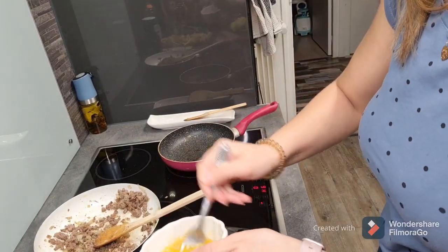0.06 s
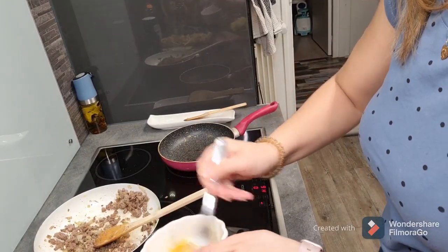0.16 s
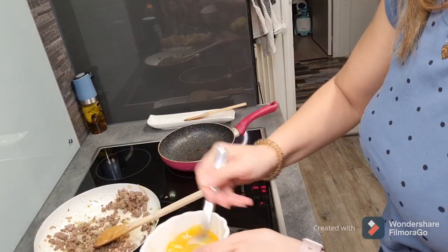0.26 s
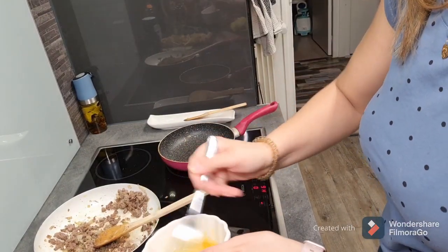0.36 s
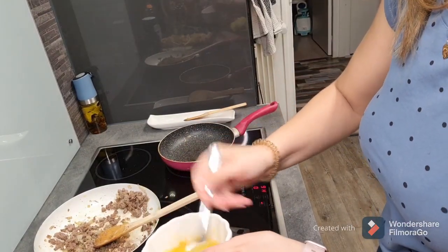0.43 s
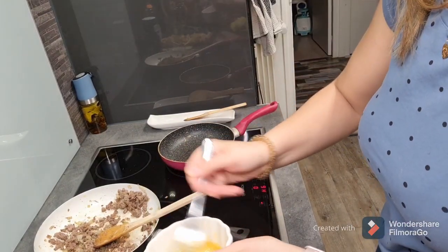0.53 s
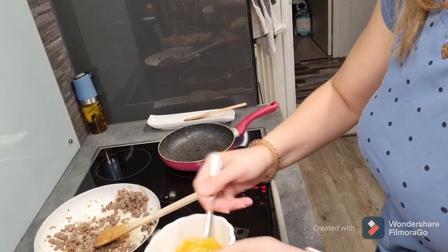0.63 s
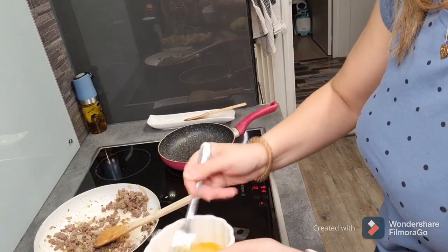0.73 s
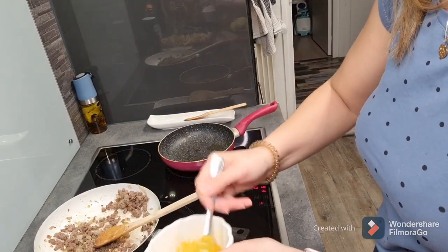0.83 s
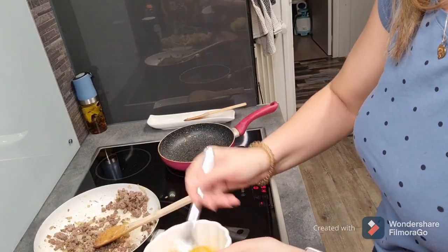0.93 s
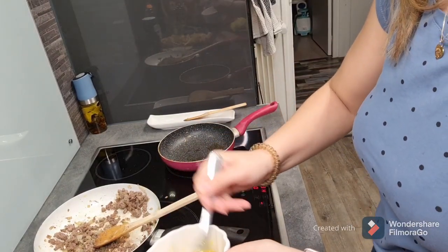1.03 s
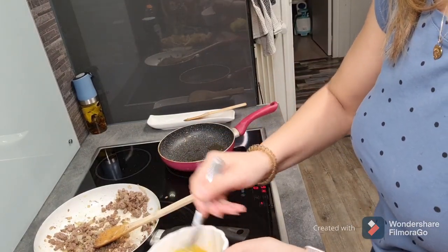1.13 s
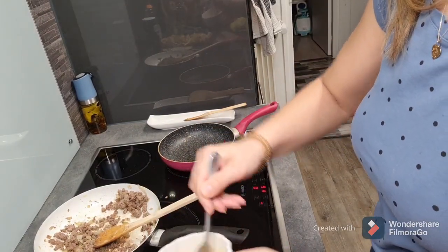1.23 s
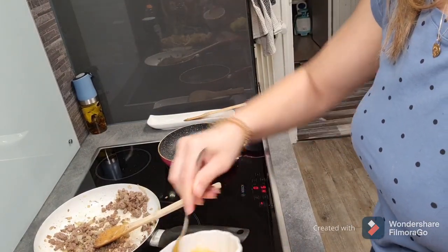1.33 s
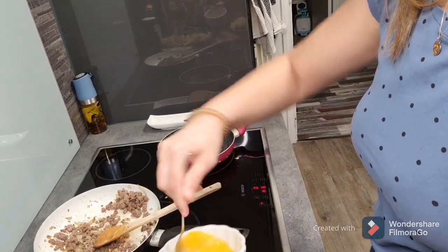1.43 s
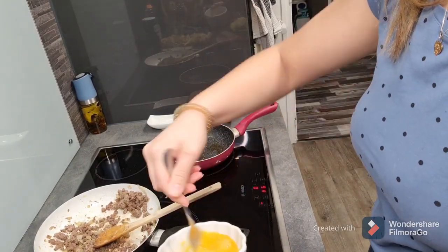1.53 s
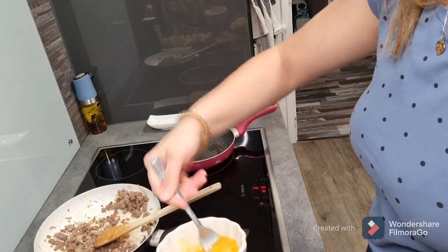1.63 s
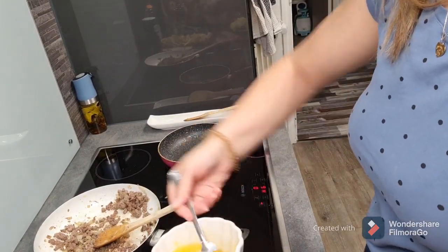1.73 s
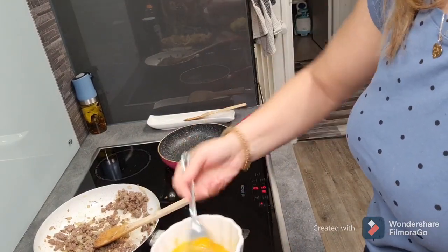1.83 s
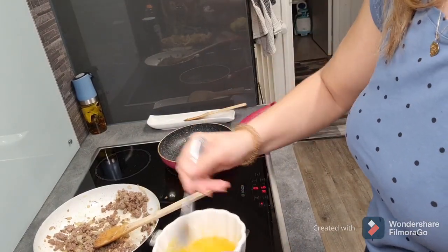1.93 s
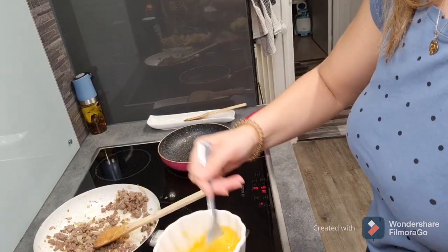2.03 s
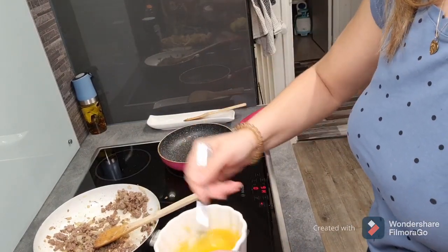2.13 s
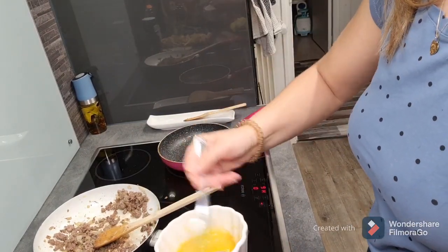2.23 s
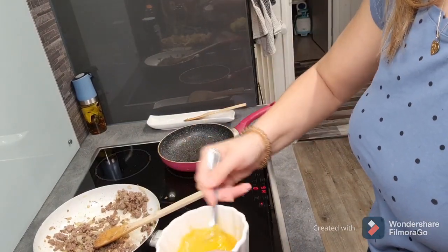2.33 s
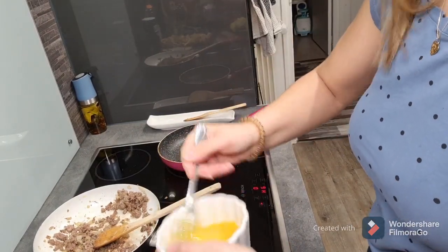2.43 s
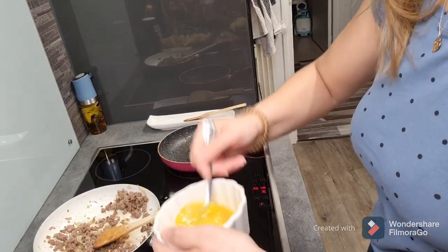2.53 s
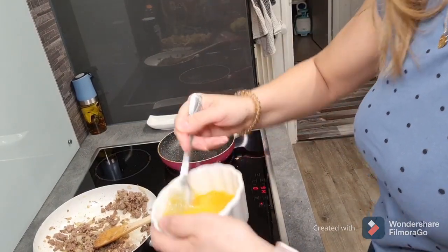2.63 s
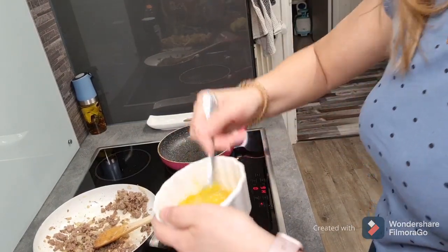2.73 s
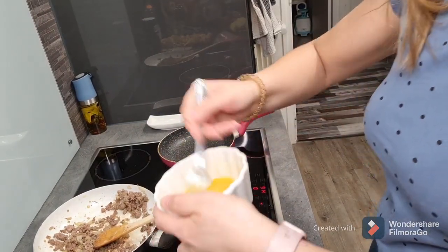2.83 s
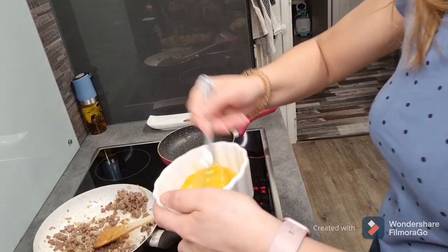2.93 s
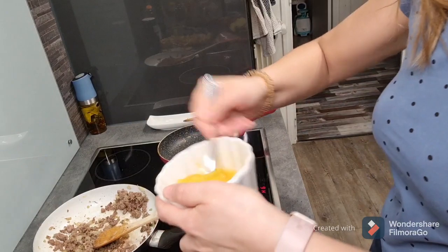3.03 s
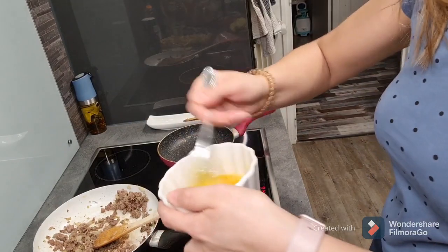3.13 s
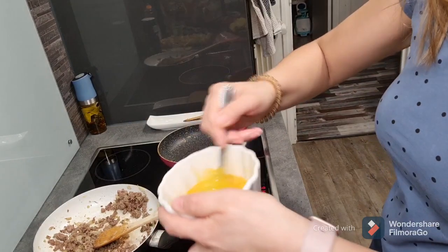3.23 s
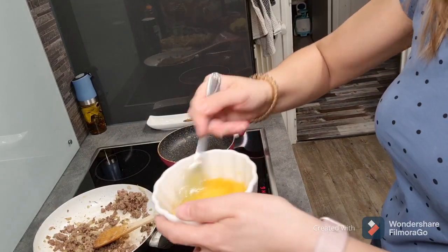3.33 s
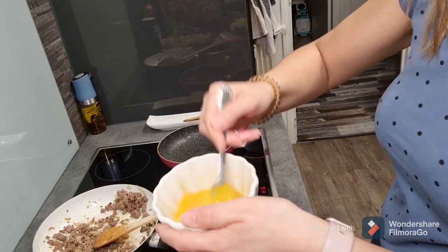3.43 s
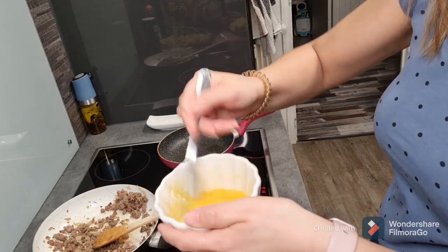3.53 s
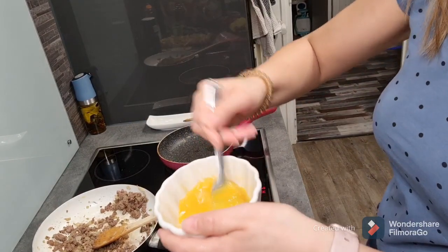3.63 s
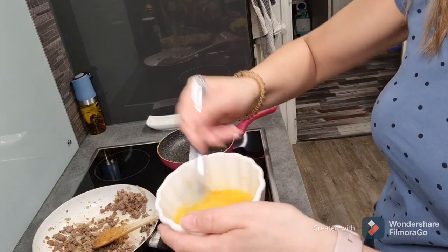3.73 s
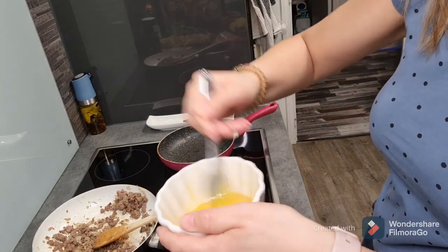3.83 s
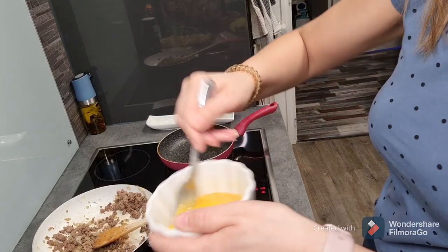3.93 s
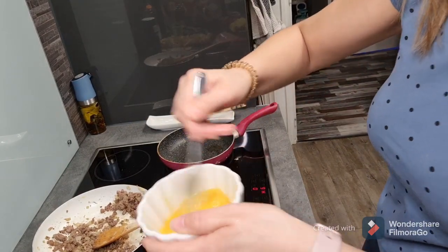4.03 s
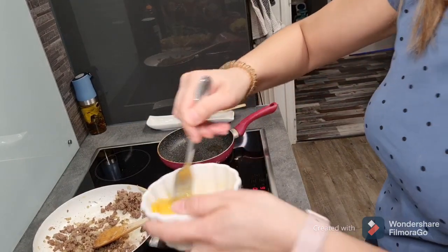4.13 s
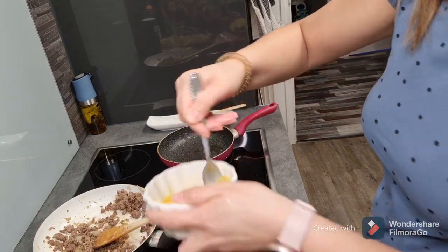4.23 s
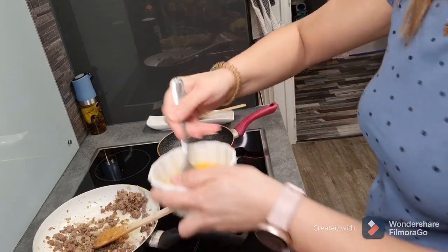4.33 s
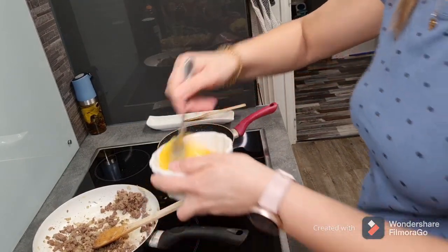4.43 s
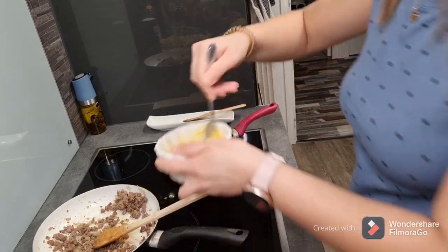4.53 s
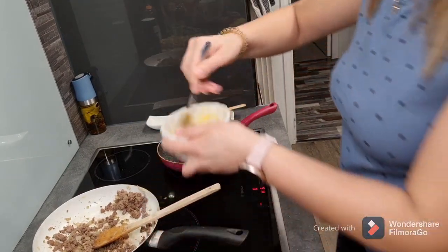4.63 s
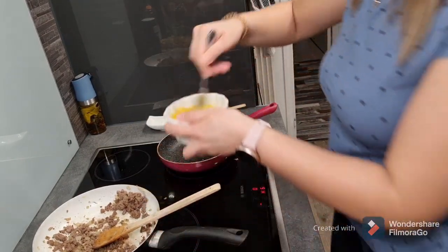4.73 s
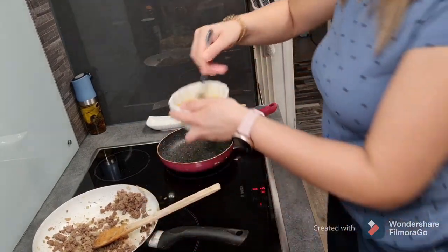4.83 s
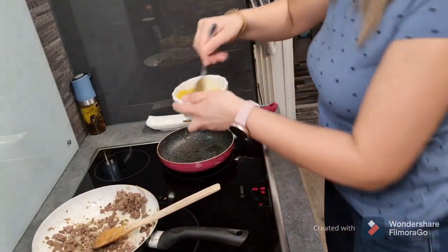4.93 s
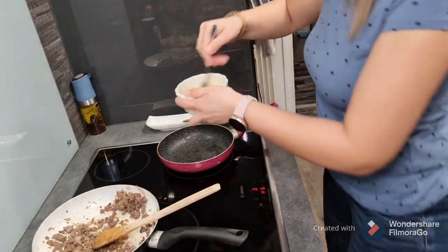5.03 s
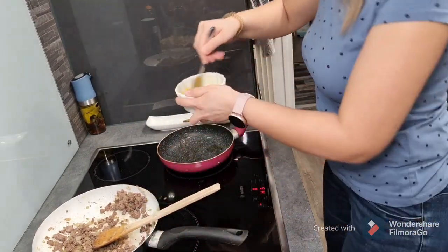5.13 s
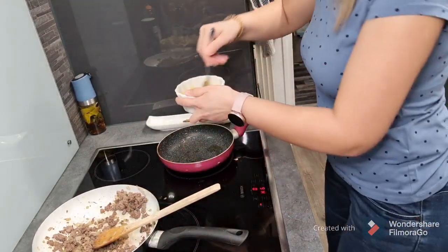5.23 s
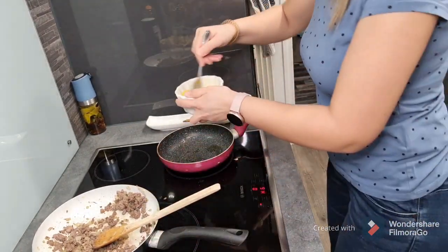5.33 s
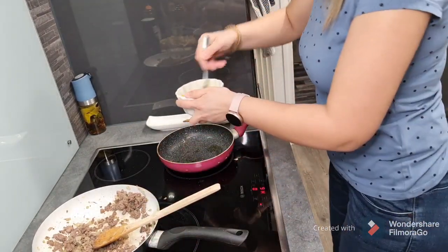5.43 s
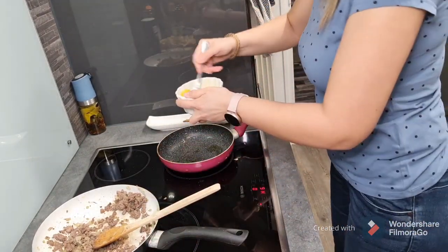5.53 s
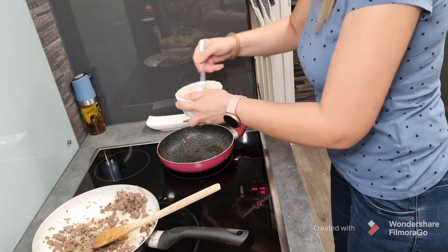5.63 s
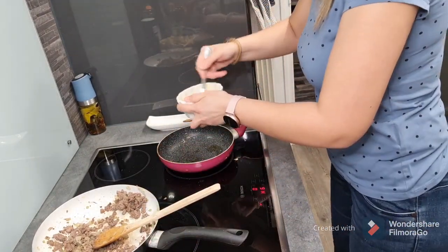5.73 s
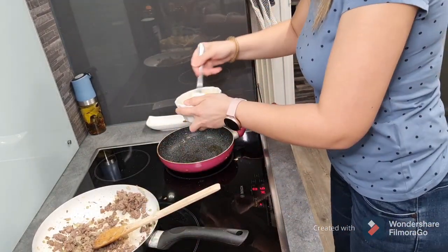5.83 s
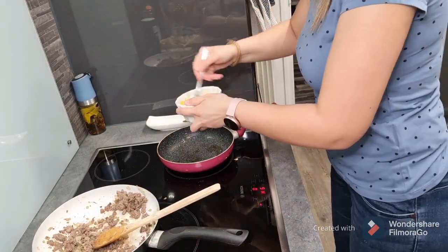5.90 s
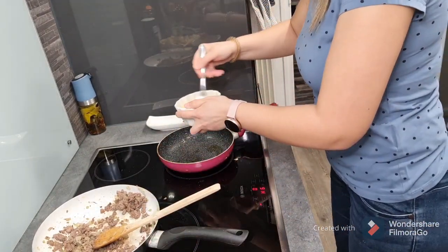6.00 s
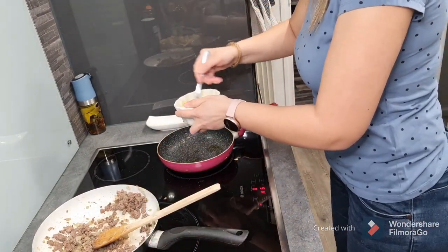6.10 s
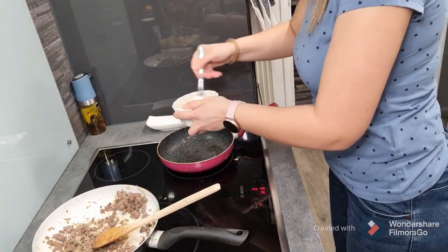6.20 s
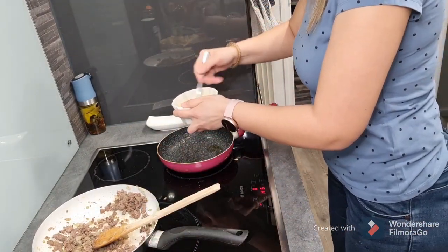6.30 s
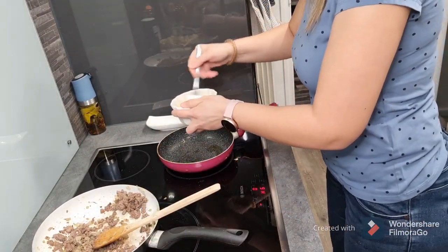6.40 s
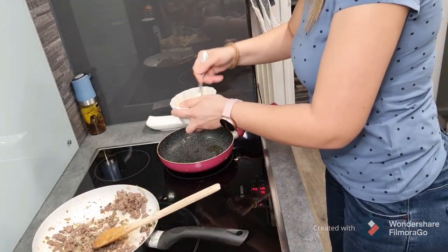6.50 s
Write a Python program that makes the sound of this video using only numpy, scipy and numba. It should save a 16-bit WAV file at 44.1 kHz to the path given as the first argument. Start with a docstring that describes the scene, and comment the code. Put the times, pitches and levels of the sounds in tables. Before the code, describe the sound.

A fork briskly beats eggs in a ceramic bowl, clinking and swishing wetly, then moves away into softer scraping over a low kitchen hum.

```python
"""A steel fork beats eggs in a hand-held ceramic bowl, between five and six strokes a second, in a small kitchen.
Each stroke ticks and clonks as decaying modes of bowl, tines and fork, and swishes through the egg as
friction noise in gliding resonances; trapped air adds short low gulps and bubbles of rising pitch.
After four seconds the bowl is carried further off: its echo swells, then sinks, and a soft, sizzling
scrape of stirring joins. Steady appliance hum and a low room rumble lie behind it throughout."""
import sys
import numpy as np
from scipy import signal
from scipy.fft import rfft, irfft
from scipy.io import wavfile
from numba import njit

SR = 44100
rng = np.random.default_rng(int(sys.argv[2]) if len(sys.argv) > 2 else 0)


def file_out(sig):
    """Save sig as 16-bit WAV at sys.argv[1]."""
    # one column per channel
    cols = np.atleast_2d(sig).T
    # limit, then scale
    lim = np.clip(cols, -1, 1)
    pcm = np.round(lim * 32767).astype(np.int16)
    wavfile.write(sys.argv[1], SR, pcm)


N = 289296
TIME = np.arange(N) / SR
HIT = TIME[:SR // 6]  # time within one strike, s

# fork meets bowl, relative levels:
# (time [s], bowl knock [dB], tine tick [dB], clonk level [dB], clonk pitch [Hz], clonk t60 [s])
FORK_STRIKES = [(0.0298, -23.5, -37.5, -36, 1770, 0.035), (0.2056, -22.5, -40, -24.5, 1747, 0.039),
                (0.2677, -35, -43.5, -39, 1600, 0.045), (0.389, -25.5, -39.5, -37, 1870, 0.033),
                (0.4231, -26, -50, -15.5, 1795, 0.039), (0.5784, -28, -35.5, -16.5, 1910, 0.013),
                (0.596, -28, -59, -29, 1900, 0.0085), (0.731, -41, -61, -39.5, 1720, 0.075),
                (0.75, -29, -39.5, -18.5, 1860, 0.0084), (0.764, -23, -37, -27, 1710, 0.1),
                (0.9087, -22, -37.5, -20, 1470, 0.035), (0.9458, -25, -44, -16, 1730, 0.024),
                (1.083, -20.5, -43, -27, 1470, 0.019), (1.093, -23, -41, -25, 1780, 0.047),
                (1.1366, -36, -50, -9.5, 1880, 0.013), (1.1866, -37, -63, -30.5, 1730, 0.027),
                (1.2521, -25.5, -64, -35, 1540, 0.027), (1.2625, -46, -40.5, -31.5, 3580, .037),
                (1.3416, -28, -46.5, -43, 1320, 0.054), (1.3721, -24, -43.5, -38, 1520, 0.033),
                (1.679, -24.5, -57, -36.5, 1810, 0.028), (1.847, -20, -42, -25, 1560, 0.013),
                (1.8785, -24, -45.5, -26, 1590, 0.013), (2.071, -32, -43.5, -32.5, 3510, 0.022),
                (2.098, -28.5, -35.5, -34, 1670, .024), (2.271, -26.5, -40, -27.5, 1710, .028),
                (2.4458, -18.5, -37, -39.5, 1306, 0.084), (2.482, -37, -58, -28, 1660, 0.027),
                (2.6025, -36, -50, -42.5, 1450, 0.034), (2.6337, -30, -39, -30, 1665, 0.034),
                (2.6507, -42, -62, -26.5, 1435, 0.083), (2.786, -56, -62, -18, 1320, 0.017),
                (2.792, -21, -44, -14.5, 1440, 0.035), (2.8093, -26, -36.5, -63, 1900, .02),
                (2.9927, -35, -39, -18.5, 2035, .016), (3.1422, -34, -54, -27.5, 1230, 0.021),
                (3.1574, -4.5, -29, -34, 2480, 0.068), (3.163, -14, -60, -32, 1890, 0.1),
                (3.331, -15, -41, -20.5, 1410, 0.0093), (3.3378, -23, -32, -11, 2540, 0.0091),
                (3.384, -35, -79, -30.5, 1310, 0.039), (3.506, -14, -38.5, -9.5, 1980, .011),
                (3.5172, -42, -37.5, -33, 1510, 0.022), (3.7092, -29, -31, -25, 2160, 0.016),
                (3.7206, -18.5, -52, -27, 1250, 0.062), (3.7494, -39, -66, -28, 1450, 0.049),
                (3.8705, -14.5, -64, -1.5, 2100, 0.0084), (3.8822, -18, -33.5, -25, 1440, 0.022),
                (4.0541, -15, -31.5, -20.5, 1455, 0.071), (4.0853, -44, -53, -29.5, 1450, 0.082),
                (4.2044, -6.5, -26.5, -12.5, 1925, 0.025), (4.2443, -22.5, -41, -28.5, 1690, .02),
                (4.359, -27, -48, -32, 3290, 0.02), (4.4479, -15, -36, -22.5, 2140, 0.026),
                (4.5918, -21.5, -43.5, -22, 1740, 0.024), (4.644, -16, -45, -24, 1890, 0.021),
                (4.792, -29.5, -44, -28.5, 1565, .021), (4.7945, -43, -59, -32.5, 3280, 0.023),
                (4.904, -34, -58, -30, 2800, 0.022), (4.908, -44, -62, -30.5, 3480, 0.013),
                (4.9769, -26, -47, -60, 1700, 0.025), (5.183, -29, -45.5, -43, 1374, 0.078),
                (5.622, -33, -43.5, -36, 1420, 0.036), (5.827, -30, -42, -39, 1300, 0.05),
                (5.8602, -30, -45, -34, 1300, .06), (5.975, -24.5, -41.5, -30, 1434, 0.082),
                (5.998, -36, -50, -35, 1500, 0.03), (6.4322, -39, -50, -28.5, 1420, 0.028)]
# fork dragged through the egg, relative levels: (time of the middle [s], level [dB], length [s], scrape pitch [Hz])
EGG_PASSES = [(0.073, -40.5, 0.084, 1476), (0.241, -39.5, 0.063, 1700), (0.425, -30.5, 0.046, 1900),
              (0.594, -25.5, 0.031, 1780), (0.771, -28.5, 0.026, 1720), (0.944, -31, 0.056, 1840),
              (1.124, -33, 0.054, 1840), (1.293, -34.5, 0.071, 1720), (1.668, -47.5, 0.13, 2240),
              (1.868, -41, 0.043, 1560), (2.121, -47, 0.079, 1760), (2.296, -34.5, 0.056, 1760),
              (2.466, -39.5, 0.075, 1480), (2.651, -30, 0.036, 1510), (2.803, -24, 0.029, 1450),
              (3.002, -37, 0.026, 1820), (3.17, -33.5, 0.042, 1750), (3.351, -28, 0.033, 1330),
              (3.531, -33, 0.054, 1780), (3.722, -28, 0.04, 1500), (3.884, -21.5, 0.027, 1448),
              (4.09, -33, 0.06, 1470), (4.219, -29, 0.037, 1760), (4.326, -41.5, 0.024, 1550),
              (4.449, -30, 0.015, 1480), (4.65, -36.5, 0.046, 1960), (4.795, -51, 0.01, 1480),
              (4.87, -50, 0.052, 1460), (4.986, -42.5, 0.037, 1700), (5.188, -38, 0.024, 1555),
              (5.321, -40, 0.019, 1370), (5.413, -41, 0.02, 1760), (5.695, -39.5, 0.035, 1640),
              (5.877, -38.5, 0.048, 1480), (5.989, -26, 0.029, 1350), (6.056, -42.5, 0.062, 1840),
              (6.257, -40.5, 0.053, 1420), (6.364, -47, 0.01, 1350), (6.442, -38, 0.041, 1620)]
# the tines stay on the ceramic once the egg is stirred: (time [s], friction level [dB])
STIR_FRICTION = [(0, -91), (3.9, -95), (4.3, -51), (4.75, -64.5), (5.35, -53.5), (5.65, -57.5),
                 (6.1, -55.5), (6.56, -51.5)]
# modes of the bowl, damped by the hand and the egg: (frequency [Hz], level [dB], t60 [s])
BOWL_MODES = [(1930, -1, .08), (2470, -3, .06), (2720, -3, .06), (3100, -5, .06), (3500, -3, .06),
              (3760, -1, .07), (3970, 0, .06), (4280, -3, .06), (4565, -3, .06), (4770, -4, .06),
              (4960, -4, .06), (5220, -5, .06), (5960, -8, .06)]
# where the bowl is held: (time [s], left minus right [dB])
BOWL_PLACE = [(0, 1.5), (1.8, 3), (2.8, 3), (3.2, 3), (3.7, 2.5), (4.2, 4), (4.6, -0.5), (6.56, 2)]


def fork(knock_db=9.0, tick_db=23.5):
    """Every contact sounds both the bowl and the tines, and a neighbouring tine lands a moment later."""
    # colour of the contact on the ceramic: (frequency [Hz], level [dB])
    ceramic_colour = [(150, -25.5), (450, -41.5), (800, -24), (1500, -5), (2600, 3.5), (4000, -4),
                      (5300, -2.5), (6500, -11.5), (10000, -22.5), (16000, -33)]
    # colour of the contact on the steel: (frequency [Hz], level [dB])
    steel_colour = [(3000, -29), (7000, -8), (8300, 4), (9300, 5.5), (10500, -3), (12500, -6.5),
                    (16000, -3.5)]
    # modes of the steel tines: (frequency [Hz], level [dB], t60 [s])
    tine_modes = [(8540, -16.5, 0.047), (8950, 4, 0.031), (8730, 11.5, 0.024), (8900, -21, 0.035)]
    shortest_s, longest_s, bounce_db = 0.002, 0.0076, -10.5  # delay and level of the second tine
    tine_pan_db = 0.5
    out = np.zeros((2, N))
    for (s, bowl_db, steel_db, *_), late in zip(FORK_STRIKES, rng.random(len(FORK_STRIKES))):
        pan_db = np.interp(s, *np.transpose(BOWL_PLACE))
        bounce_s = shortest_s + late * (longest_s - shortest_s)
        for delay, db in ((0, 0), (bounce_s, bounce_db)):
            bowl = strike(ceramic_colour, BOWL_MODES, chatter_db=-11, ring_db=-12, width=0.76)
            steel = strike(steel_colour, tine_modes, chatter_db=-17, ring_db=-7.5, width=0.76)
            add(out, s + delay, undb(bowl_db + knock_db + db) * bowl, pan_db)
            add(out, s + delay, undb(steel_db + tick_db + db) * steel, pan_db + tine_pan_db)
    return out


def strike(spectrum, modes, chatter_db, ring_db, width):
    """A sharp crack and a brief chatter of the contact, coloured by the spot that is hit, over decaying modes."""
    crack = np.exp(-HIT / 0.00038)
    chatter = undb(chatter_db) * np.exp(-HIT / 0.0062) + undb(-21.0) * np.exp(-HIT / 0.0063)
    envelope = crack + chatter
    spot = np.array(spectrum) + [0, 2.2] * rng.standard_normal((len(spectrum), 1))  # scatters the levels only
    contacts = [unit(colour(envelope * noise, spot)) for noise in rng.standard_normal((2, len(HIT)))]
    hz, db, t60 = np.transpose(modes)[:, :, None]
    detune = 0.015 * rng.standard_normal((len(modes), 1))
    spot_db = 3 * rng.standard_normal((len(modes), 1))
    ring = undb(db + spot_db - 60 * HIT / t60) * np.sin(2 * np.pi * hz * (1 + detune) * HIT)
    return unit(stereo(*contacts, width) + undb(ring_db) * unit(ring.sum(0)))


def clonks(slide=0.015):
    """The fork's bending modes, knocked into motion against the bowl; the pitch depends on where it lands."""
    # bending modes: (multiple of the clonk pitch [ratio], level [dB], share of the clonk's t60 [ratio])
    bending_modes = [(1.001, 1.5, 0.9), (1.411, -12, 0.69)]
    clonk_pan_db, pan_scatter_db = -1, -2
    out = np.zeros((2, N))
    scatter = rng.standard_normal((len(FORK_STRIKES), 2))
    for (s, _, _, db, hz, t60), (bend, side) in zip(FORK_STRIKES, scatter):
        pan_db = np.interp(s, *np.transpose(BOWL_PLACE)) + clonk_pan_db + pan_scatter_db * side
        for ratio, mode_db, share in bending_modes:
            note = ping(hz * ratio, t60 * share, glide=slide * bend)
            add(out, s, undb(db + mode_db) * note, pan_db)
    return out


def ping(hz, t60, glide, onset_s=0.00087):
    """One resonance rings for a few cycles, damped by the thick egg, while its pitch may slide."""
    t = TIME[:int(t60 * SR) + 2]
    envelope = (1 - np.exp(-t / onset_s)) * undb(-60 * t / t60)
    return envelope * np.sin(2 * np.pi * hz * t * (1 + glide * t / t60))


def swishes(swish_db=-5.5, stir_spray_db=-6, q=19.0, upper_db=-3, broad_db=-2, width=0.85, wet_hz=2040):
    """The tines scrape through the egg: friction rings the fork's gliding resonances and throws a fine wet spray."""
    # spray of a pass: (time [s], level before the length correction [dB])
    spray_level = [(0, -54), (2.3, -54.5), (3.9, -69.5), (4.7, -56), (5.2, -54.5), (6.56, -45.5)]
    # colour of steel rubbing on wet ceramic: (frequency [Hz], level [dB])
    rub_colour = [(500, -6), (1000, -14.5), (1400, 6.5), (2000, 0.5), (2900, 2.5), (3600, -18.5),
                  (5500, -19), (8000, -30), (16000, -42)]
    # colour of the egg spray: (frequency [Hz], level [dB])
    spray_colour = [(1500, -12), (3500, -4), (5500, 3), (7200, -1.5), (9000, 0.5), (10500, -0.5),
                    (16000, -4)]
    spray_db_per_octave = 0.5  # a pass twice as long throws this much more spray
    stir_swell_db = -1.5  # the rubbing dips at each pass and swells between passes
    upper_centre_hz = 2735  # second resonance of the sliding fork
    glide, glide_scatter = 0.083, 0.036  # both resonances rise through each pass and sink on the way back
    wet_glide, wet_scatter = 0.11, 0.15  # the egg's resonances rise as it drains from the tines
    muffle = 0.35  # a harder pass goes deeper: dB lost in the upper resonances per dB above the average pass

    s, db, length, hz = np.transpose(EGG_PASSES)
    spray_db = np.interp(s, *np.transpose(spray_level)) + spray_db_per_octave * np.log2(length / length.mean())
    turn = 2 * np.pi * np.interp(TIME, s, np.arange(len(s)))  # one turn of the wrist from pass to pass
    stir = undb(curve(STIR_FRICTION) + stir_swell_db * np.cos(turn))
    rub = np.sqrt(stir ** 2 + passes(db + swish_db))
    splash = np.sqrt((stir * undb(stir_spray_db)) ** 2 + passes(spray_db))

    lower_hz, upper_hz = (centre * np.exp(glide * np.sin(turn) + glide_scatter * wander(rate_hz=12))
                          for centre in (np.interp(TIME, s, hz), upper_centre_hz))
    # egg clinging to the tines adds two restless resonances
    low_wet_hz, high_wet_hz = (wet_hz * ratio * np.exp(wet_glide * np.sin(turn) + wet_scatter * wander(rate_hz=22))
                               for ratio in (0.9, 1.25))
    deep_db = muffle * np.interp(TIME, s, np.maximum(db - db.mean(), 0))
    voices = [(lower_hz, 0), (upper_hz, upper_db - deep_db),
              (low_wet_hz, broad_db), (high_wet_hz, broad_db - deep_db)]
    # the tines grip and let go, so each resonance comes in bursts of its own
    grips = [undb(7 * np.tanh(wander(rate_hz=70))) for _ in voices]

    parts = []
    for _ in range(2):
        slips = colour(friction(grain_db=3.5), rub_colour)
        body = sum(undb(gain_db) * steady(resonance(slips * grip, track, q))
                   for (track, gain_db), grip in zip(voices, grips))
        drops = colour(friction(grain_db=2.0), spray_colour)
        sheen_hz = 9200 * np.exp(0.029 * wander(rate_hz=26))
        sheen = resonance(drops, sheen_hz, 26.0) * undb(3.7 * wander(rate_hz=23))
        spray = steady(drops) + undb(-3) * steady(sheen)
        parts.append(rub * steady(body) + splash * spray)
    return stereo(*parts, width)


def passes(levels_db, lead_s=0.0034, rise=0.33, fall=0.52):
    """Power of all passes through the egg: each bites quickly and lets go more slowly."""
    s, _, length = np.array(EGG_PASSES).T[:3, :, None]
    t = np.arange(0, N / SR, 0.001)
    progress = (t - s + lead_s) / length  # the peak comes just ahead of the middle
    shape = np.exp(-np.minimum((progress / np.where(progress < 0, rise, fall)) ** 2, 50))
    return np.interp(TIME, t, undb(levels_db) ** 2 @ shape)


def friction(grain_db):
    """Dense tiny slips of uneven size."""
    return rng.standard_normal(N) * undb(grain_db * np.minimum(rng.exponential(size=N), 6))


@njit
def resonance(x, hz, q):
    """State-variable band-pass whose centre may glide."""
    y, band, low = np.empty(len(x)), 0., 0.
    for i in range(len(x)):
        g = np.tan(np.pi * hz[i] / SR)
        v = (band + g * (x[i] - low)) / (1 + g * (g + 1 / q))
        band, low, y[i] = 2 * v - band, low + 2 * g * v, v / q
    return y


def gulps(t60=0.041, pan_db=-3):
    """Pockets of air close in the egg as the fork dips in, each with a short low hollow note."""
    # hollow notes: (time [s], pitch [Hz], level [dB])
    air_pockets = [(0.123, 1150, -42.5), (0.599, 1060, -30), (0.765, 1123, -35.5), (0.863, 1020, -44),
                   (0.911, 934, -29.5), (1.0823, 1028, -24), (1.136, 984, -38.5), (1.187, 882, -42),
                   (1.372, 972, -43.5), (1.6024, 1044, -39.5), (1.878, 1020, -49), (2.098, 1046, -37),
                   (2.793, 900, -35), (3.16, 900, -37.5), (3.332, 710, -32.5), (3.51, 725, -38.5),
                   (3.7205, 872, -30.5), (3.872, 698, -36), (4.054, 750, -32.5), (4.792, 920, -45),
                   (4.905, 984, -43.5), (4.908, 545, -48)]
    out = np.zeros((2, N))
    for s, hz, db in air_pockets:
        add(out, s, undb(db) * ping(hz, t60, glide=0.014), pan_db)
    return out


def bubbles(level_db=-35, growth=0.87, stir_db=7, spread_db=9, pitch_scatter=0.206, pan_db=3, count=600):
    """Small pockets of beaten-in air ring with a rising pitch, loudest where the fork drives through the egg."""
    typical_hz, t60_s, rise = 2237, 0.023, 0.1
    out = np.zeros((2, N))
    db = np.array(EGG_PASSES)[:, 1]
    drive = passes(level_db + growth * (db - db.mean()))
    level = np.sqrt(drive + undb(curve(STIR_FRICTION) + stir_db) ** 2)
    for (when, small), (pitch, side) in zip(rng.random((count, 2)), rng.standard_normal((count, 2))):
        note = ping(typical_hz * np.exp(pitch_scatter * pitch), t60_s, glide=rise)
        add(out, when * N / SR, level[int(when * N)] * undb(-spread_db * small) * note, pan_db * side)
    return out


def rattle(spread_db=10.5):
    """During each pass the tines skip over the bowl's fluted wall in light, uneven taps."""
    # colour of a light tap of one tine on the wall: (frequency [Hz], level [dB])
    tap_colour = [(600, -22.5), (1400, 1), (2800, 0), (4100, -4.5), (6000, -7.5), (16000, -34)]
    taps_per_s, average_db = 150, -46.5  # level in an average pass
    growth = 0.5  # dB of rattle per dB of the pass
    db = np.array(EGG_PASSES)[:, 1]
    taps = (rng.random(N) < taps_per_s / SR) * undb(-spread_db * rng.random(N))
    taps = steady(taps) * np.sqrt(passes(average_db + growth * (db - db.mean())))
    tap = strike(tap_colour, BOWL_MODES, chatter_db=-26, ring_db=-13, width=0.95)
    return np.array([signal.fftconvolve(taps, channel)[:N] for channel in tap])


def jolt():
    """One hard blow jolts the bowl in the hand: a short dull thud at a single low pitch."""
    out = np.zeros((2, N))
    add(out, 4.2055, undb(-48) * ping(hz=257, t60=0.017, glide=0))
    return out


def kitchen(x, gap_s=0.00033, build_s=0.0021, width=0.99, sparse_db=4):
    """Hob, splashback and walls return a patter of early echoes that thickens into a short tail."""
    # echo by band: (band centre [Hz], level [dB], t60 [s])
    echo_bands = [(270, -40, 0.63), (704, 5.5, 0.4), (1670, -0.5, 0.25), (4000, -3.5, 0.51),
                  (9600, 1, 0.36), (15100, 4, 0.27)]
    t = TIME[:SR // 2]
    centres, levels, t60s = np.transpose(echo_bands)
    freqs = np.log(np.maximum(np.fft.rfftfreq(len(t), 1 / SR), 1))
    onset = 1 - np.exp(-np.maximum(t - gap_s, 0) / build_s)
    echoes = []
    for _ in range(2):
        noise = rng.standard_normal(len(t))
        unevenness_db = sparse_db * np.exp(-t / 0.042) * rng.exponential(size=len(t))
        patter = rfft(noise * undb(unevenness_db))
        response = np.zeros(len(t))
        for share, db, t60 in zip(np.eye(len(centres)), levels, t60s):
            band = irfft(patter * np.interp(freqs, np.log(centres), share), len(t))
            response += onset * band * undb(db - 60 * t / t60)
        echoes.append(signal.fftconvolve(x, unit(response))[:N])
    return stereo(*echoes, width)


def appliances(rumble_db=-59, airy_db=-2, pan_db=-2.0):
    """Mains and motor lines beat against each other over a rumble that is more alike left and right in the bass."""
    # steady hum lines: (frequency [Hz], level before the pan [dB rms])
    hum_lines = [(49.4, -69), (51.1, -55), (59.2, -68), (69.1, -66), (78.9, -66), (100.1, -52),
                 (108.6, -70), (111.3, -56), (137.2, -66), (148.5, -78), (174.3, -77), (237.2, -80),
                 (300.1, -72)]
    # colour of the room rumble: (frequency [Hz], relative density [dB])
    rumble_colour = [(20, -1.5), (32, -2), (42, 7.5), (65, -2), (115, 0), (160, -10.5), (320, -12),
                     (560, -17.5), (800, -19.5), (1500, -29), (4000, -35.5), (16000, -70)]
    phases = rng.uniform(0, 2 * np.pi, len(hum_lines))
    hum = sum(undb(db) * np.sqrt(2) * np.sin(2 * np.pi * hz * TIME + phase)
              for (hz, db), phase in zip(hum_lines, phases))
    mid, side = (undb(rumble_db) * steady(colour(rng.standard_normal(N), rumble_colour)) for _ in range(2))
    side = colour(side, [(60, -6), (150, -11.0), (400, airy_db)])
    return np.array([hum + mid + side, hum + mid - side]) * undb([[pan_db / 2], [-pan_db / 2]])


def undb(db):
    """Decibels to gain."""
    return 10 ** (np.asarray(db) / 20)


def unit(x):
    """Scale to an energy of one."""
    return x / np.sqrt(np.sum(x ** 2, axis=-1, keepdims=True))


def steady(x):
    """Scale a full-length signal to an rms of one."""
    return unit(x) * np.sqrt(N)


def curve(rows):
    """Join (time, value) rows by straight lines."""
    return np.interp(TIME, *np.transpose(rows))


def wander(rate_hz):
    """Random levels joined by straight lines; spread near 1.4."""
    knots = rng.standard_normal(4096)
    return 1.77 * np.interp(TIME * rate_hz, np.arange(len(knots)), knots)


def colour(x, points):
    """Causal filter through (Hz, dB) points, from the cepstrum of its log gain."""
    hz, db = np.transpose(points)
    size = 4096
    freqs = np.maximum(np.fft.rfftfreq(size, 1 / SR), 1)
    gain_db = np.interp(np.log(freqs), np.log(hz), db)
    cepstrum = irfft(np.log(undb(gain_db)))
    # fold the cepstrum forward in time: minimum phase
    cepstrum[1:size // 2] *= 2
    cepstrum[size // 2 + 1:] = 0
    return signal.fftconvolve(x, irfft(np.exp(rfft(cepstrum))))[:len(x)]


def add(out, s, sound, pan_db=0):
    """Mix a sound into both channels at a time; a positive pan leans left."""
    start = max(int(s * SR), 0)
    part = np.atleast_2d(sound)[:, :N - start]
    out[:, start:start + part.shape[1]] += undb([[pan_db / 2], [-pan_db / 2]]) * part


def stereo(mid, side, width):
    """Left and right from a common and an opposed part."""
    return np.array([mid + width * side, mid - width * side]) / np.sqrt(1 + width ** 2)


def scene():
    """The whisking close to the microphones, its echo from the kitchen and the hum behind."""
    # echo as the bowl moves away: (time [s], level sent into the echo [dB])
    echo_share = [(0, -2.5), (2.5, -1), (4.2, -3.5), (4.9, 4.5), (6.56, -4.5)]
    left, right = fork() + clonks() + gulps() + swishes() + bubbles() + rattle() + jolt()
    direct = np.array([left, np.roll(right, shift=1)])  # the left microphone is a little nearer to the bowl
    echo = kitchen((left + right) / 2 * undb(curve(echo_share)))
    return direct + echo + appliances()


def record(dry):
    """A steep low-pass in the microphone's chain cuts the top."""
    top_hz = 15600
    return signal.sosfilt(signal.ellip(10, 0.2, 70, top_hz, fs=SR, output="sos"), dry)


dry = scene()
out = record(dry)
file_out(out)
```